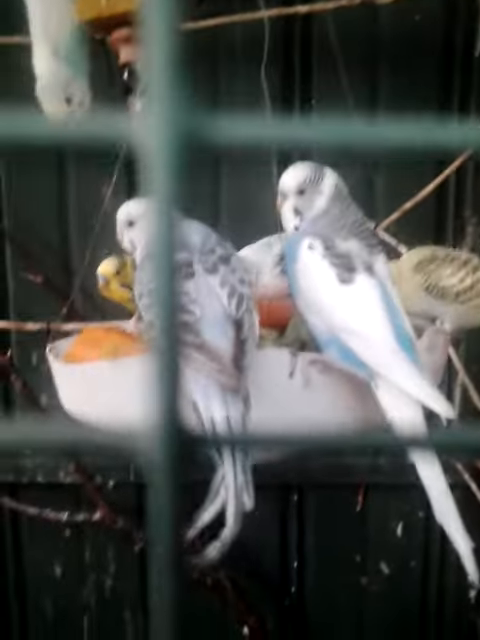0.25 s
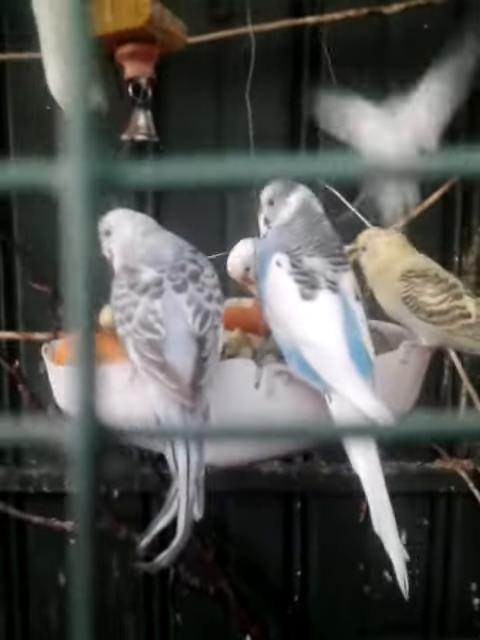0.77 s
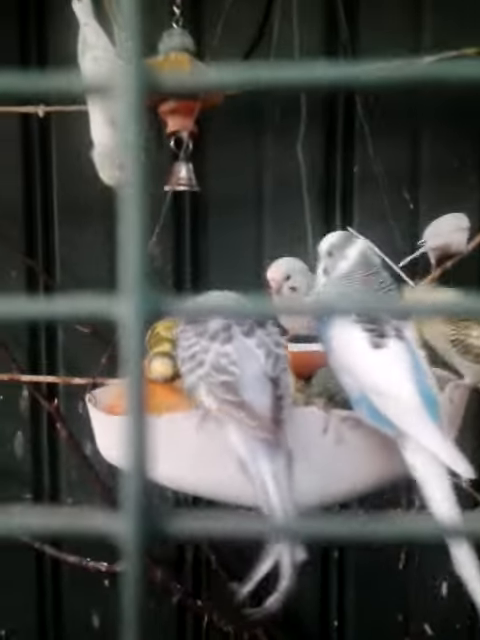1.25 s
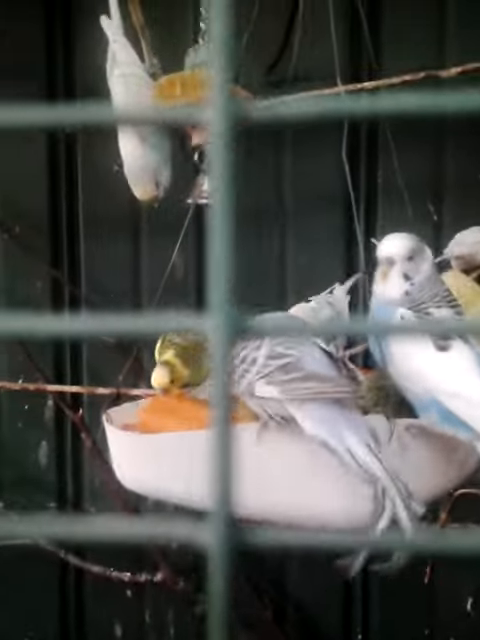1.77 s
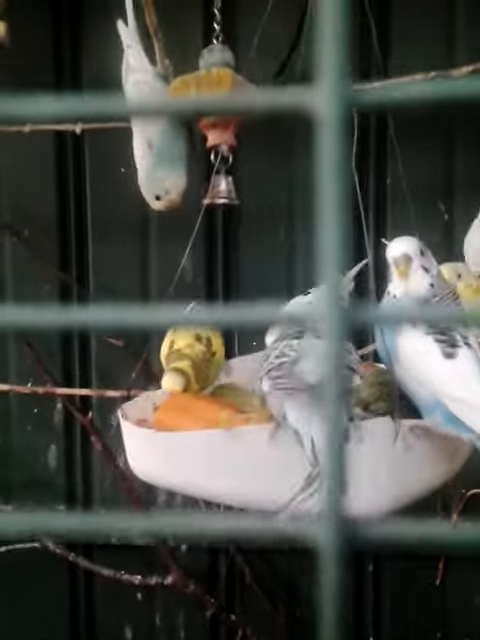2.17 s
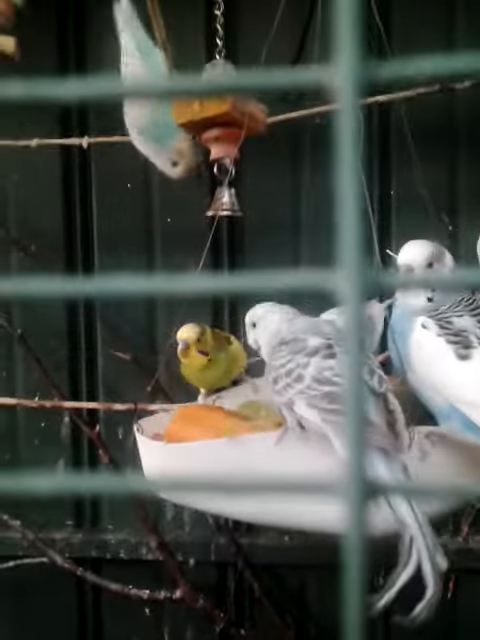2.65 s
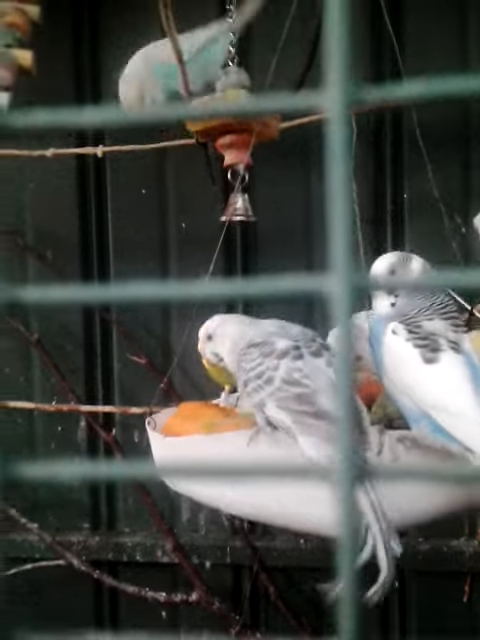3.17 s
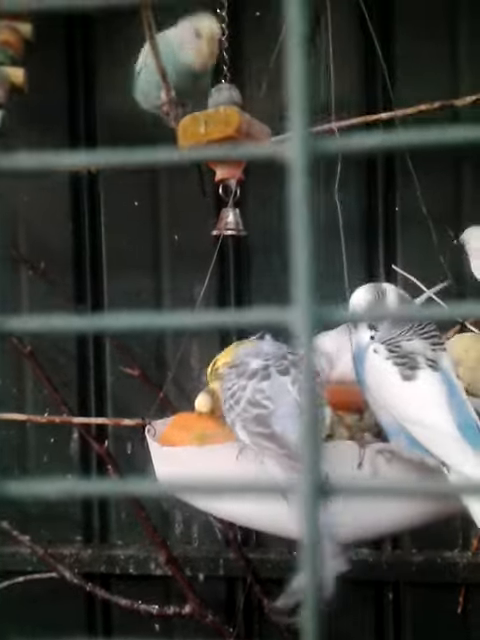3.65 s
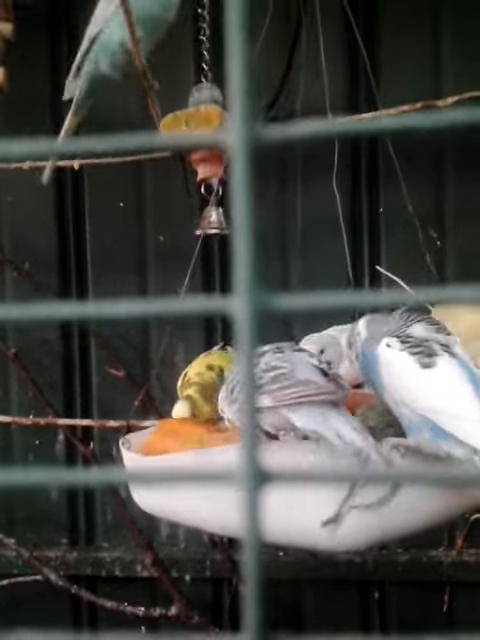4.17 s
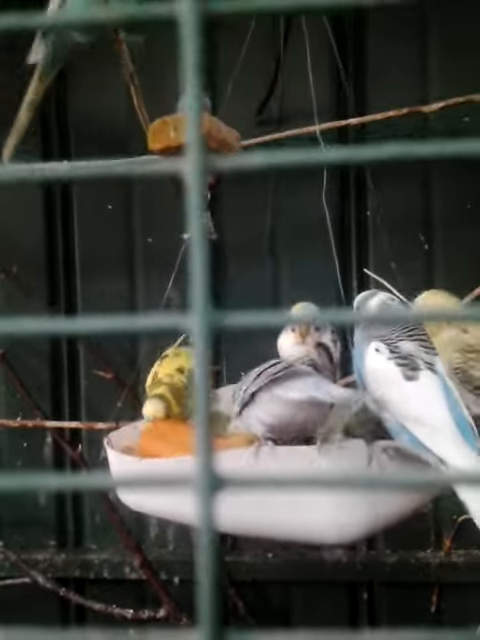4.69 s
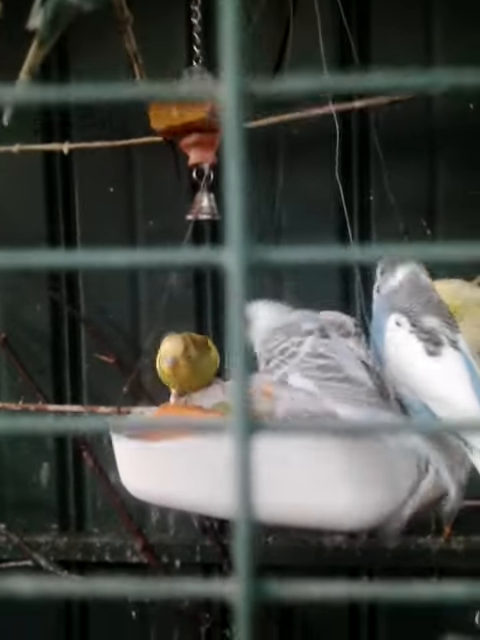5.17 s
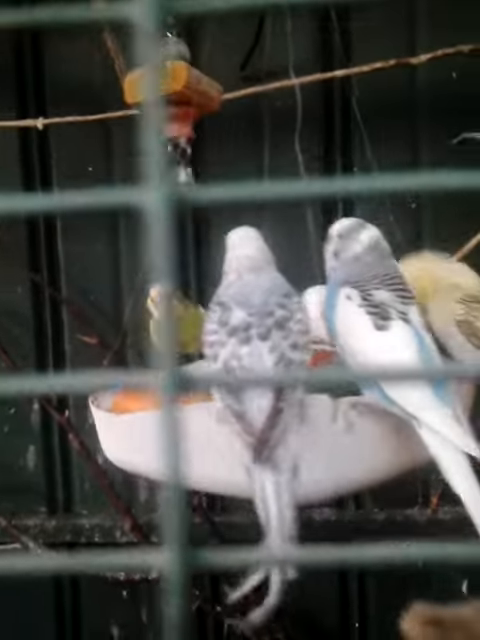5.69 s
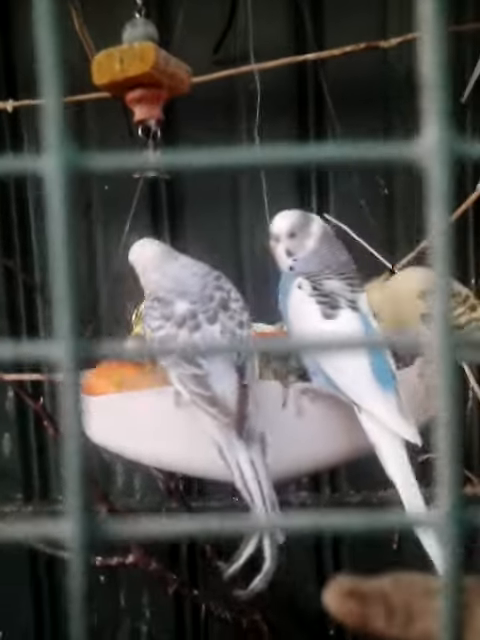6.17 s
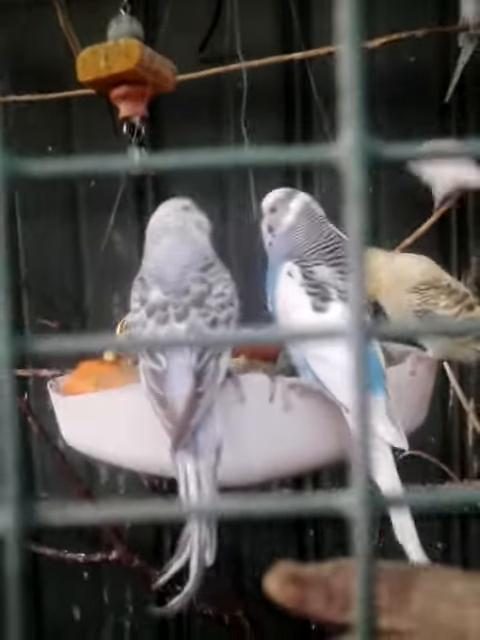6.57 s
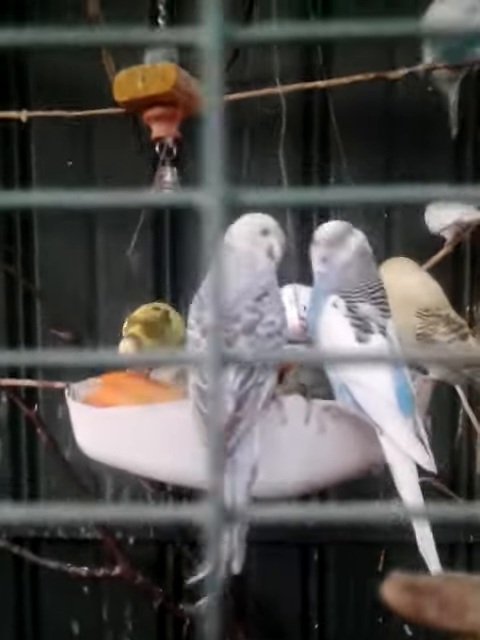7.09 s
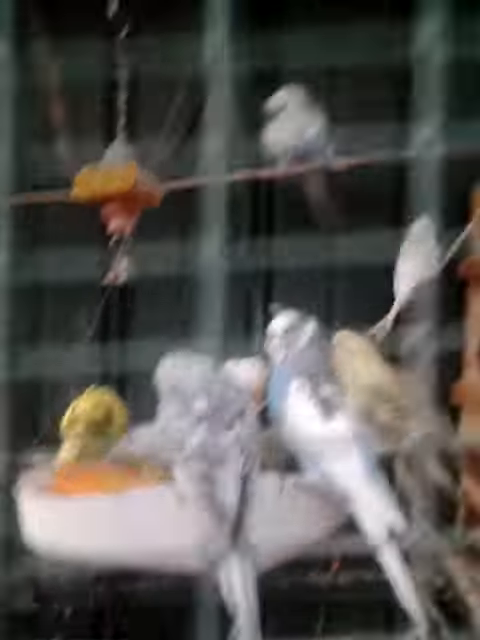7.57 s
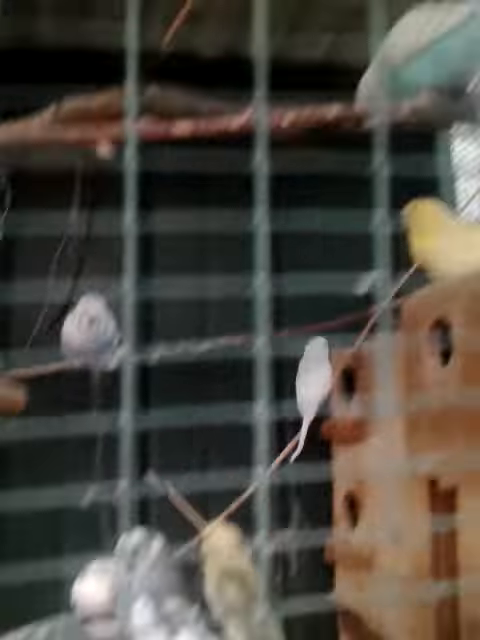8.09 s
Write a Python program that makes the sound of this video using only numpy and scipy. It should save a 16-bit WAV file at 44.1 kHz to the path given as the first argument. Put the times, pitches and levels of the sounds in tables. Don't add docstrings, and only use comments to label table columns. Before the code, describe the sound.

A small flock of parrots feeds in an echoing aviary. Wing claps and perch knocks come first over sparse sound, then quick clusters of tiny gliding chirps. A loud rasping squawk cuts in near three seconds, another near five, then the brightest, densest warbling around six. Feathers rustle, claws tick, distant birds whistle faintly. A small, treble-dulled microphone catches low wind and traffic.

```python
import sys
import numpy as np
from scipy import signal
from scipy.fft import rfft, irfft, next_fast_len
from scipy.io import wavfile

SR = 44100
rng = np.random.default_rng(int(sys.argv[2]) if len(sys.argv) > 2 else 0)


def boost_factor(decibels):
    exponent = np.asarray(decibels, float) / 20
    return 10 ** exponent


def generate_wav(sig):
    pcm = np.round(np.clip(np.atleast_2d(sig).T, -1, 1) * 32767).astype(np.int16)
    wavfile.write(sys.argv[1], SR, pcm)


N = 367794

HELD_CLEAR = [(1.393, 0.021, 3174, -39), (1.66, 0.023, 3820, -27.5), (1.7, 0.034, 3800, -31.5),
              (1.755, 0.04, 3765, -47.5), (2.068, 0.009, 4040, -43), (2.127, 0.013, 2000, -35.5),
              (2.211, 0.019, 3424, -22), (2.541, 0.085, 1116, -43), (2.68, 0.0205, 2810, -33.5),
              (2.895, 0.01, 2065, -32), (1.82, .015, 3800, -50), (7.842, .016, 2370, -43.5),
              (1.437, 0.024, 3720, -32), (3.091, 0.011, 3590, -24), (4.256, 0.076, 2202, -44),
              (4.406, 0.013, 3097, -22.5), (7.766, 0.025, 3840, -47), (7.872, 0.016, 4100, -29),
              (4.232, .018, 2743, -36), (6.168, 0.0069, 2870, -10.5), (2.51, .014, 3520, -52.5),
              (2.69, .018, 3800, -41.5), (6.206, 0.029, 3250, -28.5), (6.419, 0.0069, 1960, -33),
              (6.421, 0.013, 3480, -23), (6.597, 0.029, 3040, -25.5), (7.407, 0.026, 3276, -24),
              (1.632, 0.031, 3880, -42.5)]
HELD_REEDY = [(2.315, 0.033, 3440, -33), (2.442, 0.013, 1420, -41), (3.137, 0.017, 3120, -35.5),
              (3.702, 0.01, 2075, -44), (4.22, 0.018, 3160, -41), (2.535, .03, 2600, -50.5),
              (2.433, .01, 2900, -42.5), (2.31, 0.018, 1700, -41.5), (5.146, 0.02, 3400, -23),
              (5.541, 0.039, 1842, -48), (5.711, 0.014, 3790, -41), (6.45, 0.0091, 2810, -21),
              (6.395, 0.04, 2500, -35), (1.62, 0.011, 1350, -47), (1.65, 0.0095, 1900, -44),
              (2.555, .012, 4100, -47), (5.905, .02, 2100, -46), (7.3, .022, 1000, -54)]
SAGGING_CLEAR = [(.058, .016, 2106, -41.5), (1.469, 0.033, 2890, -29.5), (1.497, .024, 3590, -23.5),
                 (2.095, 0.018, 3010, -37.5), (2.151, 0.027, 4100, -31.5), (2.252, 0.014, 2590, -35.5),
                 (2.359, 0.025, 2343, -36.5), (2.844, 0.017, 3503, -24), (2.868, 0.022, 2650, -30.5),
                 (6.577, .03, 2200, -31.5), (2.6, .03, 3100, -39.5), (0.0, .022, 3100, -37.5),
                 (.042, .03, 3300, -42), (4.378, 0.014, 3080, -36), (7.346, .016, 4100, -30),
                 (2.228, .008, 3500, -21), (5.849, 0.011, 3880, -35.5), (5.857, 0.025, 3725, -28),
                 (5.879, 0.014, 2880, -27), (6.559, 0.024, 2760, -26.5), (6.651, 0.028, 2900, -33.5),
                 (7.297, 0.021, 3200, -36.5), (7.369, 0.02, 3098, -25.5), (7.427, 0.029, 2844, -27)]
SAGGING_REEDY = [(2.217, .025, 4040, -35.5), (2.297, 0.024, 3920, -34), (4.286, 0.048, 3370, -40),
                 (1.297, .04, 1850, -47), (5.575, 0.042, 2757, -48.5), (5.783, 0.013, 3230, -40),
                 (6.342, 0.041, 1762, -46), (6.368, 0.013, 3946, -24), (6.449, 0.037, 2340, -36.5),
                 (6.511, 0.014, 2093, -33), (6.579, .021, 2083, -26), (6.592, 0.053, 3850, -36.5),
                 (6.603, 0.031, 1970, -35.5), (7.226, 0.016, 3270, -41)]
PLUNGING = [(1.519, 0.015, 3190, -20.5), (1.531, 0.0093, 2284, -27), (2.171, 0.022, 3375, -27),
            (2.52, 0.019, 1720, -43.5), (4.318, 0.02, 3580, -33.5), (5.797, 0.013, 2930, -42),
            (4.711, 0.046, 4220, -41.5), (4.803, 0.014, 3770, -36.5), (6.092, 0.016, 3310, -28.5),
            (6.108, 0.016, 2376, -35.5), (6.24, 0.02, 2510, -32), (7.315, 0.019, 2374, -40.5),
            (7.826, 0.016, 2900, -44)]
DIVING = [(1.458, 0.018, 3700, -31.5), (2.025, 0.013, 3720, -35), (2.116, 0.0063, 2750, -32.5),
          (2.232, 0.01, 3700, -31.5), (2.309, 0.018, 3300, -36), (2.527, 0.022, 3520, -41.5),
          (2.593, 0.011, 4200, -40), (2.672, 0.025, 4000, -34), (2.944, 0.021, 2800, -36),
          (5.13, 0.021, 4900, -25.5), (5.72, 0.012, 4200, -45), (5.812, 0.013, 2600, -41.5),
          (5.868, 0.016, 3500, -33), (6.018, 0.01, 3700, -38.5), (6.152, 0.012, 3850, -20),
          (6.214, 0.018, 3000, -32.5), (7.359, 0.013, 4000, -26), (7.812, 0.014, 3700, -36.5)]
LIFTING = [(1.417, 0.022, 2166, -39), (2.343, 0.018, 2450, -32.5), (2.413, 0.043, 1198, -44),
           (2.626, 0.041, 2377, -44.5), (2.654, 0.031, 3910, -40), (6.35, .04, 2036, -44.5),
           (4.751, 0.022, 2207, -41), (4.963, 0.023, 2540, -27.5), (5.013, 0.024, 3323, -30),
           (5.112, 0.028, 4664, -27), (5.521, 0.0099, 3200, -41), (6.531, .029, 3207, -31),
           (6.557, 0.062, 3210, -29)]
LEAPING = [(2.783, 0.02, 3080, -35.5), (2.826, 0.025, 3320, -25), (3.111, 0.021, 2296, -33),
           (4.201, 0.032, 3790, -43), (4.268, 0.019, 4020, -43), (5.755, 0.025, 3860, -47.5),
           (6.063, 0.024, 3650, -44), (6.13, 0.015, 3365, -38), (6.18, 0.018, 2790, -36),
           (6.34, 0.024, 1905, -40), (6.356, 0.012, 3956, -28), (6.471, 0.016, 1077, -36.5),
           (6.521, 0.033, 2005, -30), (7.27, 0.037, 3940, -54), (7.79, 0.025, 3800, -42.5),
           (7.884, 0.013, 4430, -24.5), (4.393, .014, 2680, -34), (2.575, 0.015, 3830, -44.5),
           (6.508, 0.018, 3680, -37)]
SHOOTING = [(1.428, 0.018, 2300, -36.5), (2.205, 0.0097, 2600, -33.5), (2.638, 0.017, 2200, -39),
            (3.099, .015, 1400, -41.5), (5.106, 0.027, 3800, -30), (6.528, 0.016, 2050, -37),
            (7.86, .012, 3100, -37), (1.488, .01, 2600, -35.5), (4.308, 0.0087, 3200, -32)]
NASAL = [(2.758, 0.02, 2484, -32), (2.803, .018, 2825, -25), (7.752, .012, 3100, -44),
         (6.437, .03, 2840, -28), (4.78, .04, 3300, -39), (4.671, .02, 3100, -44)]
PINCHED = [(6.923, 0.0107, 2080, -42), (6.321, .007, 1850, -39.5)]
PIERCING = [(6.137, .016, 3800, -28), (6.15, .007, 3800, -18), (6.194, .012, 3850, -15),
            (6.21, .012, 3700, -29)]
# [rows, glide/(Hz per s), octave level/dB, third partial level over the octave/dB]
KINDS = [(HELD_CLEAR, -1000, -21.5, -14), (HELD_REEDY, -1000, -6.5, -16), (SAGGING_CLEAR, -11000, -18, -14),
         (SAGGING_REEDY, -11500, -8.5, -16), (PLUNGING, -29000, -16, -12), (DIVING, -65000, -14.5, -18),
         (LIFTING, 10000, -17.5, -16), (LEAPING, 28000, -12, -18), (SHOOTING, 74000, -12, -18),
         (NASAL, -3000, -18, 0), (PINCHED, -1000, -2.2, -2), (PIERCING, -3000, -20, 6)]


def warble():
    notes = []
    for rows, glide, overtone_db, third_db in KINDS:
        for s, length, hz, level_db in rows:
            notes.append((s, length, hz, hz + glide * length, level_db, overtone_db, third_db))
    behind_below_db = -35.2
    close = [note for note in notes if note[4] >= behind_below_db]
    behind = [note for note in notes if note[4] < behind_below_db]
    near = whistles(close, chaos=.045, flutter=2.5, breath_db=-23, rise_s=.005, fall_s=.006)
    return near + whistles(behind, chaos=.07, flutter=3.5, breath_db=-15, rise_s=.005, fall_s=.006)


# [t/s, length/s, start f/Hz, level/dB]
GULPS = [(1.338, 0.031, 1680, -50), (4.336, .016, 2485, -44), (4.423, .022, 2880, -45),
         (5.812, 0.016, 2205, -59), (5.889, 0.011, 2530, -36), (6.172, 0.012, 2430, -40),
         (6.243, 0.016, 1870, -42), (6.454, 0.014, 2230, -40), (6.628, 0.0138, 2064, -36),
         (7.441, 0.011, 2390, -37), (7.908, 0.0092, 2310, -47.5)]


def gulps():
    end_hz, overtone_db, third_db = 1014, -4, -5.0
    notes = [(s, length, hz, end_hz, level_db, overtone_db, third_db) for s, length, hz, level_db in GULPS]
    return whistles(notes, chaos=.12, flutter=3.0, breath_db=-16, rise_s=.004, fall_s=.003)


def whistles(table, chaos, flutter, breath_db, rise_s, fall_s):
    out = np.zeros(N)
    for s, length, start_hz, end_hz, level_db, overtone_db, third_db in table:
        t = np.arange(round((length + fall_s) * SR)) / SR
        pitch = start_hz + (end_hz - start_hz) * np.minimum(t / length, 1.1)
        phase = membrane(pitch, chaos)
        upper = np.sin(3 * phase) + boost_factor(-3.0) * np.sin(4 * phase) + boost_factor(-10.5) * np.sin(5 * phase)
        overtones = np.sin(2 * phase) + boost_factor(third_db) * upper
        tone = np.sqrt(2) * (np.sin(phase) + boost_factor(overtone_db) * overtones)
        tone = tone * boost_factor(flutter * wobble(len(t), hz=194))
        tone = tone * (1 + 0.033 * wobble(len(t), hz=644))
        breath = boost_factor(breath_db) * band(len(t), 1700, 9500, order=2)
        ramp = np.minimum(t / rise_s, (t[-1] - t) / (2 * fall_s))
        shape = np.sin(np.pi / 2 * np.clip(ramp, 0, 1)) ** 2
        add(out, max(s - .002, 0), boost_factor(level_db) * shape * (tone + breath))
    return out


# [t/s, hold/s, level/dB, f/Hz, upper voice level/dB]
SQUAWKS = [
    [(-0.018, 0.059, -39, 2830, -12)],
    [(2.955, 0.03, -20.5, 3140, 4.5), (2.997, 0.047, -23.5, 3706, 4.5), (3.048, 0.011, -25, 3820, -5),
     (3.08, .004, -36, 3620, -14)],
    [(4.876, 0.018, -25.5, 2950, 1), (4.905, 0.038, -23, 3255, -20), (4.95, 0.062, -35.5, 2875, -16.5)],
    [(5.142, 0.02, -32.5, 3510, 6), (5.162, 0.0049, -26.5, 3380, 9)],
    [(6.35, 0.034, -37.5, 3750, -13), (6.45, 0.039, -36, 2900, -1), (6.53, 0.11, -45.5, 2850, -13)],
    [(7.883, 0.012, -27, 4020, -2.5), (7.905, 0.029, -38, 3540, -12), (7.934, 0.006, -28, 3550, -1),
     (7.962, 0.0035, -48.5, 3340, -1.5)],
]
# [upper voice f/Hz, pulses per s, chaos 0-1, rasp level/dB, attack/s]
THROATS = [
    (6200, 230, 0.2, -10, 0.012),
    (6100, 170, .1, 3, 0.0059),
    (5860, 280, .07, -12.5, .003),
    (5570, 460, 0.2, 5, 0.0094),
    (5700, 170, .14, 5, .011),
    (4950, 340, 0.1, 2.5, .003),
]


def squawks():
    out = np.zeros(N)
    release_s, start_db, end_db = 0.031, -13.5, -23
    for bursts, (upper_hz, pulse_hz, chaos, rasp_db, attack) in zip(SQUAWKS, THROATS):
        for s, hold, level_db, pitch, upper_db in bursts:
            corners = s + np.cumsum([0, attack, hold, release_s])
            t = np.arange(max(s, 0), corners[-1], 1 / SR)
            effort_db = np.interp(t, corners, [start_db, 0, 0, end_db])
            pulses = 1 + .78 * np.sin(membrane(pulse_hz + 0 * t, chaos=.6))
            lower = np.sin(membrane(pitch + 0 * t, chaos)) * boost_factor(2.2 * wobble(len(t), hz=120.3))
            upper = np.sin(membrane(upper_hz + 0 * t, chaos * .22))
            upper = upper * boost_factor(upper_db + 2.5 * wobble(len(t), hz=119.6))
            low_rasp = 2 * band(len(t), 2740, 4720, order=2)
            high_rasp = boost_factor(upper_db) * band(len(t), 5200, 10500, order=2)
            rasp = boost_factor(rasp_db) * (low_rasp + high_rasp)
            ends = np.clip(np.minimum(t - s, corners[-1] - t) / .002, 0, 1)
            add(out, t[0], boost_factor(level_db + effort_db) * ends * pulses * (lower + upper + rasp))
    return signal.sosfilt(signal.butter(5, 1650, "high", fs=SR, output="sos"), out)


# [t/s, peak level/dB, brightness level/dB]
KNOCKS = [(0.7714, -21.5, -10), (0.821, -20, 7), (0.901, -11.5, 0.5), (1.5967, -30.5, 10.5),
          (1.6343, -26, -1.5), (1.977, -30, -3.5), (3.378, -27, 3), (5.275, -33, -10), (3.6986, -37, -13),
          (4.6904, -20, 0), (5.5777, -23, 6.5), (6.0172, -53.5, 9.5), (7.5564, -42.5, 13)]


def knocks():
    out = np.zeros(N)
    t = np.arange(round(.08 * SR)) / SR
    attack = np.minimum(t / .003, 1)
    for s, peak_db, bright_db in KNOCKS:
        dull = band(len(t), 350, 3300, order=1) * np.exp(-t / 0.031)
        bright = band(len(t), 3600, 13000, order=1) * np.exp(-t / 0.011)
        add(out, s, boost_factor(peak_db - 17.0) * attack * (dull + boost_factor(bright_db) * bright))
    return out


# [t/s, peak level/dB, ring f/Hz]
TICKS = [(.554, -48, 8500), (.63, -46, 9000), (.7, -50.5, 8400), (1.9, -61.5, 6930), (3.239, -51.5, 6000),
         (3.389, -38, 11300), (3.631, -58, 7470), (3.848, -59, 7500), (3.93, -61, 8600), (4.106, -44, 9470),
         (7.078, -48, 6200), (4.993, -46, 11500)]


def ticks():
    out = np.zeros(N)
    t = np.arange(round(.03 * SR)) / SR
    for s, peak_db, hz in TICKS:
        ring = np.sin(2 * np.pi * hz * t) + 0.5 * np.sin(2 * np.pi * 0.69 * hz * t)
        crack = boost_factor(-4.5) * band(len(t), 3000, 12000, order=1) * np.exp(-t / .002)
        add(out, s, boost_factor(peak_db) * (ring * np.exp(-t / .004) + crack))
    return out


# [t/s, length/s, f/Hz, level/dB, octave level/dB]
FAR = [(0.406, 0.12, 3890, -60.5, -26), (0.929, 0.25, 2550, -60, -4), (1.209, 0.12, 2744, -60.5, -13.5),
       (3.908, 0.16, 2750, -59, -21), (6.74, .48, 2530, -60, -2), (7.25, .5, 2530, -62, -6),
       (3.36, .12, 3600, -64, -15), (3.98, .06, 3500, -64, -15), (4.08, .1, 3750, -64, -15),
       (3.28, .08, 1550, -66, -15), (1.73, .03, 1700, -62, -15), (.02, .36, 530, -75, -30)]


def far_birds():
    notes = [(s, length, hz, hz, level_db, overtone_db, -1.5) for s, length, hz, level_db, overtone_db in FAR]
    return whistles(notes, chaos=.045, flutter=3.5, breath_db=-30, rise_s=.015, fall_s=.03)


def aviary(x):
    t = np.arange(round(.6 * SR)) / SR
    decay = 0
    for t60_s, level_db in [(0.09, -5.5), (0.33, -15)]:
        decay = decay + boost_factor(level_db - 60 * t / t60_s) / np.sqrt(t60_s * SR / np.log(1e6))
    tail = rng.standard_normal(len(t)) * decay * (t > .003)
    tail = signal.sosfilt(signal.butter(1, 6500, fs=SR, output="sos"), tail)
    return signal.fftconvolve(x, tail)[:N]


# [t/s, half length/s, level/dB]
SWISHES = [
    (0.28, 0.15, -48.5),
    (5.51, 0.14, -42.5),
]


def swishes(t):
    swell = sum(boost_factor(level_db) * np.exp(-((t - s) / half) ** 2) for s, half, level_db in SWISHES)
    return swell * band(N, 4300, 13000, order=1)


# [t/s, half length/s, wing wind level/dB, rustle level/dB]
FLURRIES = [(0, 0.41, -89, -60.5), (0.636, 0.11, -53, -49.5), (0.946, 0.19, -42.5, -49),
            (1.602, 0.13, -62, -65), (2.227, 0.27, -73, -54.5), (2.402, 0.073, -47, -55),
            (2.622, 0.12, -58.5, -47.5), (2.918, 0.054, -56.5, -53), (3.306, 0.57, -60.5, -58.5),
            (4.28, 0.3, -62.5, -60), (4.825, 0.18, -62, -63), (5.5, 0.89, -65, -58.5),
            (6.406, 0.1, -70, -53.5), (6.916, 0.48, -60, -55.5), (7.599, 0.83, -57.5, -58)]
# [f/Hz, level/dB per Hz]
RUMBLE = [(80, -5.5), (110, 1), (216, -8.5), (336, -1.5), (565, -18.5), (800, -20)]
# [f/Hz, level/dB per Hz]
RUSTLE = [(600, -23.5), (1100, 2.5), (1800, -2.5), (2800, 2.5), (5000, -1.5), (6500, -6), (9000, -26.5)]


def flurries_over_traffic(t):
    wing_wind = swells(t, [(s, half, wind_db) for s, half, wind_db, _ in FLURRIES], steady_db=-64.5)
    rustle = swells(t, [(s, half, rustle_db) for s, half, _, rustle_db in FLURRIES], steady_db=-74)
    return wing_wind * coloured(RUMBLE, patchy_db=4.0) + rustle * coloured(RUSTLE, patchy_db=4.5)


# [t/s, half length/s, level/dB]
GUSTS = [(.96, 0.15, -64), (1.372, 0.093, -55), (1.768, 0.12, -56.5), (2.912, 0.39, -52.5),
         (4.28, 0.2, -65.5), (5.8, .4, -58), (6.996, 0.32, -58.5), (8.088, 0.83, -61.5)]


def gusts(t):
    return swells(t, GUSTS, steady_db=-71.5) * rms_one(band(N, 55, 95, order=2))


def swells(t, rows, steady_db):
    return boost_factor(steady_db) + sum(boost_factor(level_db) * np.exp(-((t - s) / half) ** 2) for s, half, level_db in rows)


def coloured(spectrum, patchy_db):
    out = 0
    edges = 20 * 2 ** np.arange(0, 10, .5)
    white = rng.standard_normal((2, N))
    hz, db = np.transpose(spectrum)
    for k, (low, high) in enumerate(zip(edges, edges[1:])):
        sos = signal.butter(2, [low, high], "band", fs=SR, output="sos")
        part = signal.sosfilt(sos, white[k % 2])
        level_db = np.interp(np.log(low * high) / 2, np.log(hz), db, -70, -70)
        flicker = np.interp(np.arange(N) / 100, np.arange(N // 100 + 1), wobble(N // 100 + 1, hz=840))
        out = out + boost_factor(level_db + patchy_db * flicker) * part
    return rms_one(out)


def membrane(pitch, chaos):
    shaken = pitch * (1 + chaos * np.tanh(wobble(len(pitch), hz=340)))
    return 2 * np.pi * np.cumsum(shaken) / SR


def wobble(size, hz):
    r = np.exp(-2 * np.pi * hz / SR)
    slow = signal.lfilter([1], [1, -2 * r, r * r], rng.standard_normal(size + 400))[400:]
    return slow * np.sqrt((1 - r * r) ** 3 / (1 + r * r))


def band(size, low_hz, high_hz, order):
    edges = signal.butter(order, [low_hz, high_hz], "band", fs=SR, output="sos")
    return signal.sosfilt(edges, rng.standard_normal(size + 2000))[2000:]


def rms_one(x):
    return x / np.sqrt(np.mean(x ** 2) + 1e-20)


def add(track, s, sound):
    i = round(s * SR)
    track[i:i + len(sound)] += sound[:N - i]


def scene():
    t = np.arange(N) / SR
    voices = warble() + gulps()
    voices = signal.sosfilt(signal.butter(3, 950, "high", fs=SR, output="sos"), voices)
    near = voices + squawks() + knocks() + ticks()
    far = far_birds()
    background = swishes(t) + flurries_over_traffic(t) + gusts(t)
    return (near + far + aviary(near + far) + background)[None]


# [f/Hz, level/dB]
MICROPHONE = [(6900, 0), (7600, -9), (9000, -16), (10500, -23), (13000, -28), (15300, -29), (15700, -60)]


def microphone(sound):
    size = next_fast_len(N + 1000)
    response = boost_factor(np.interp(np.fft.rfftfreq(size, 1 / SR), *np.transpose(MICROPHONE)))
    hiss = boost_factor(-86) * rng.standard_normal(sound.shape)
    return irfft(rfft(sound, size) * response, size)[:, :N] + hiss


def band_limit(x):
    return signal.sosfilt(signal.butter(12, 15750, fs=SR, output="sos"), x)


def record(dry):
    rounded = .95 * np.tanh(dry / .95)
    mix = microphone(rounded)
    return band_limit(mix)


dry = scene()
out = record(dry)
generate_wav(out)
```